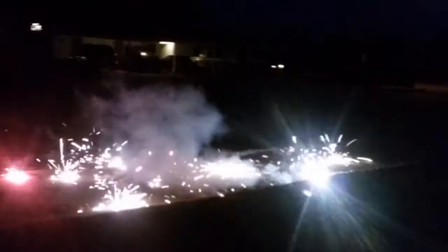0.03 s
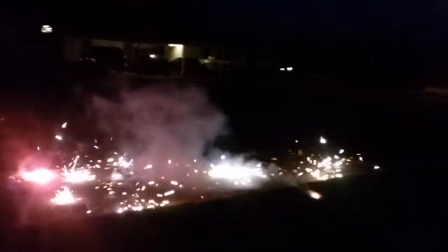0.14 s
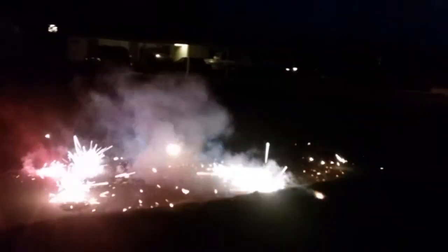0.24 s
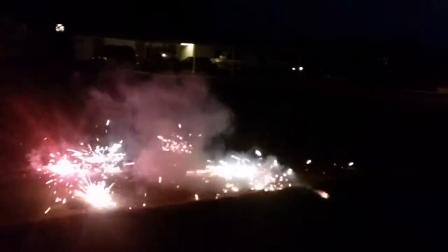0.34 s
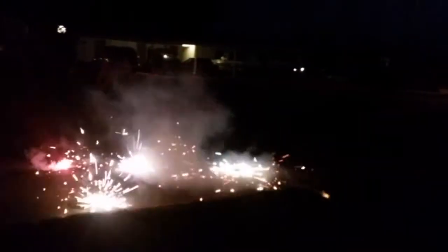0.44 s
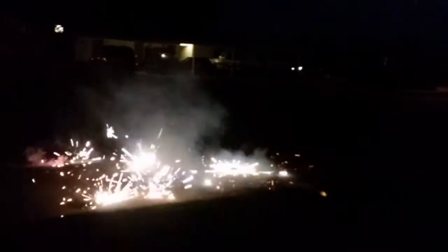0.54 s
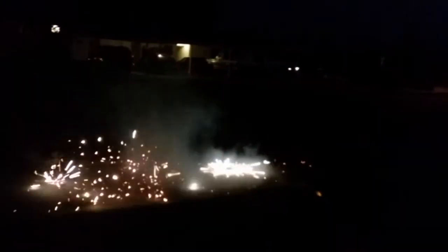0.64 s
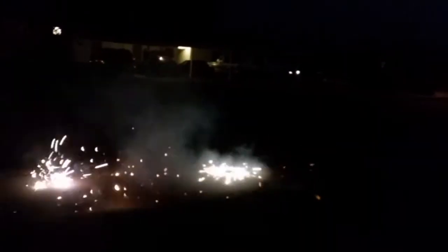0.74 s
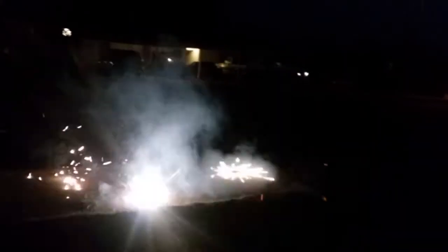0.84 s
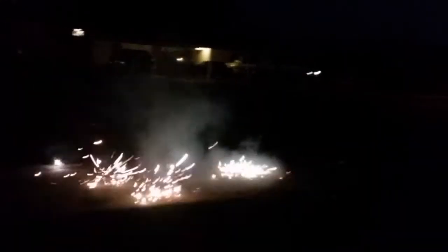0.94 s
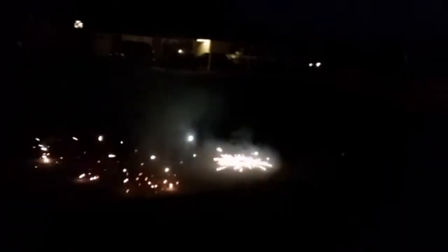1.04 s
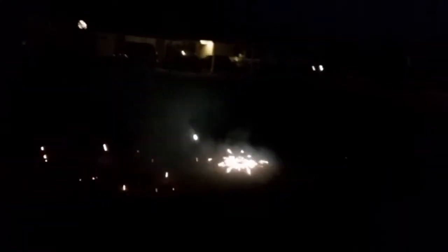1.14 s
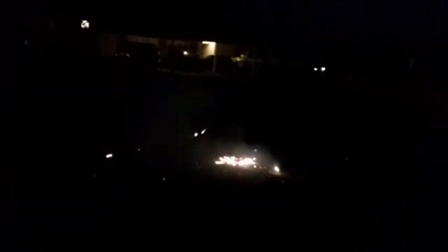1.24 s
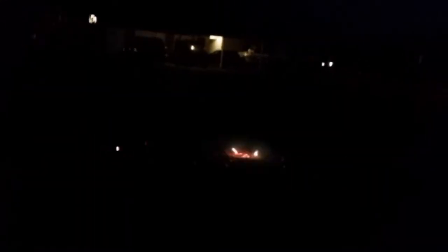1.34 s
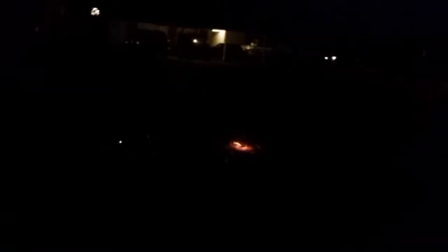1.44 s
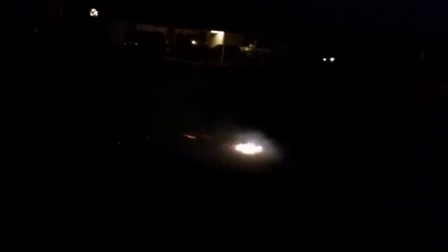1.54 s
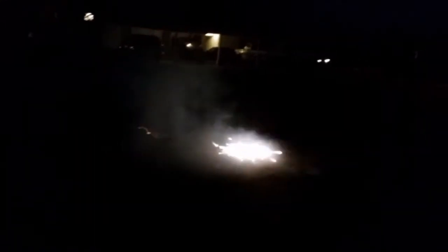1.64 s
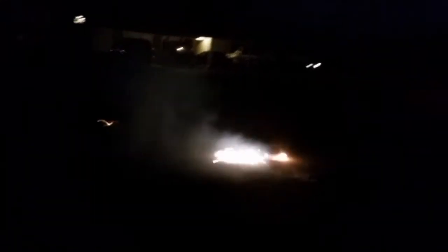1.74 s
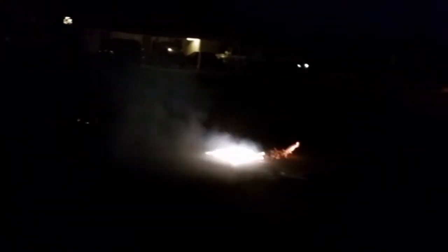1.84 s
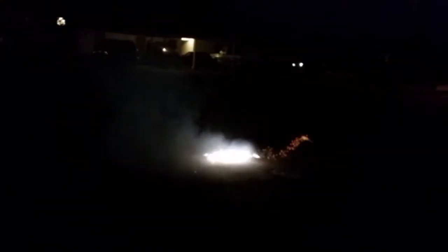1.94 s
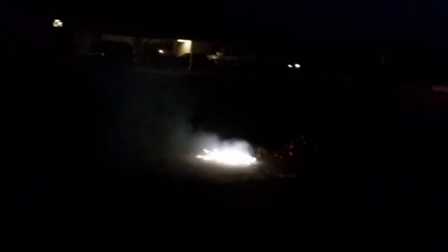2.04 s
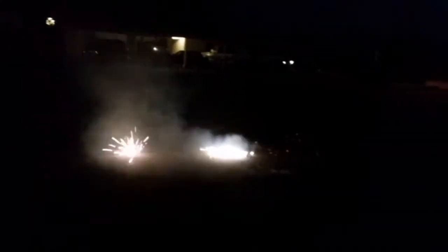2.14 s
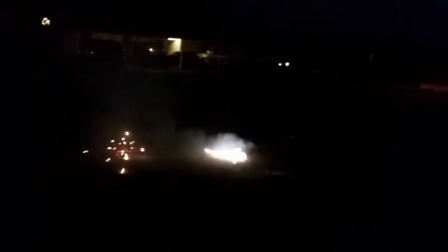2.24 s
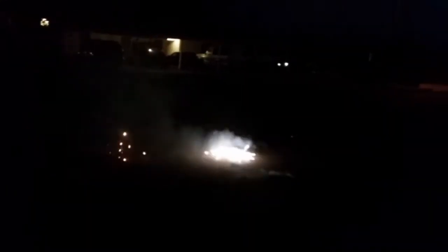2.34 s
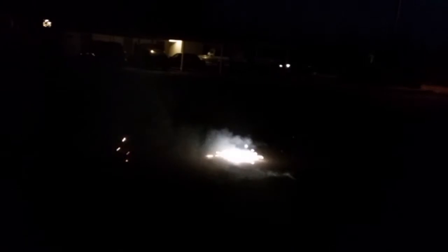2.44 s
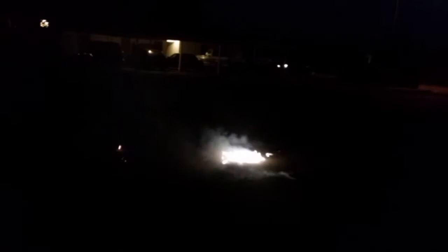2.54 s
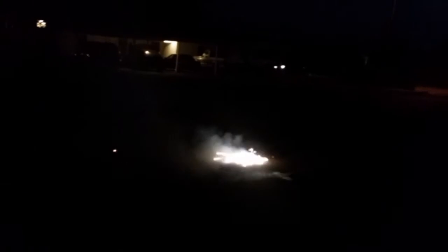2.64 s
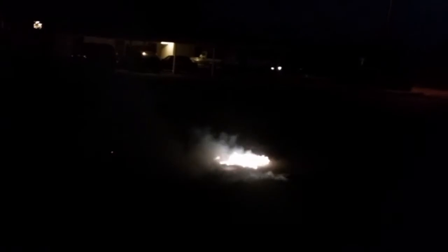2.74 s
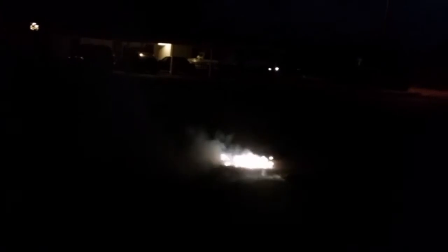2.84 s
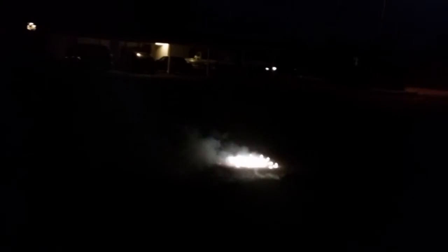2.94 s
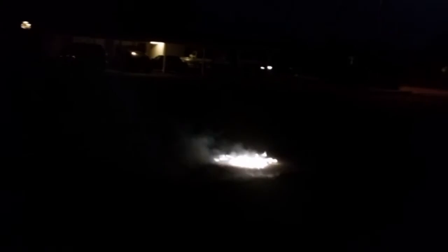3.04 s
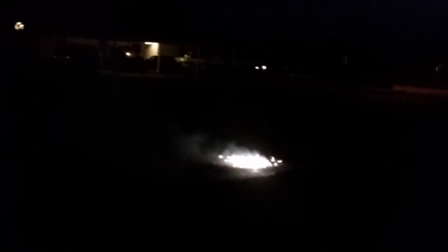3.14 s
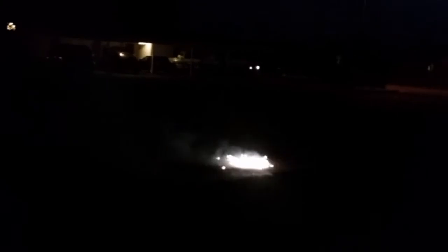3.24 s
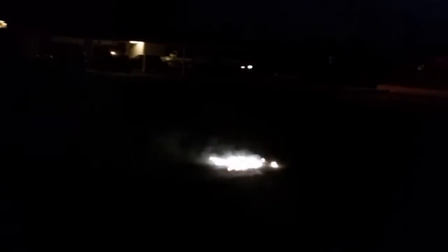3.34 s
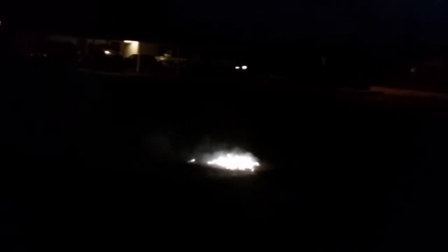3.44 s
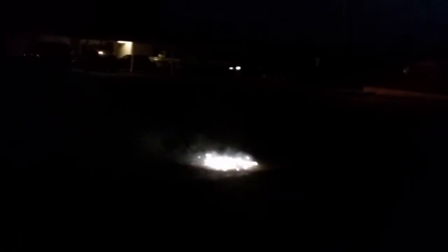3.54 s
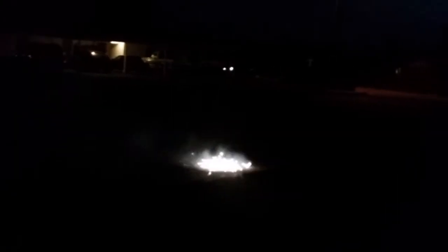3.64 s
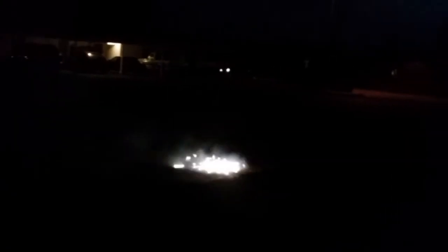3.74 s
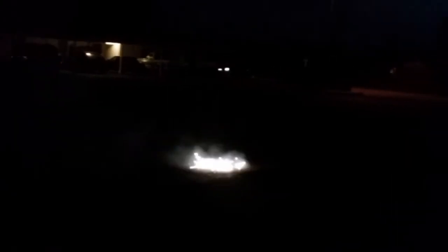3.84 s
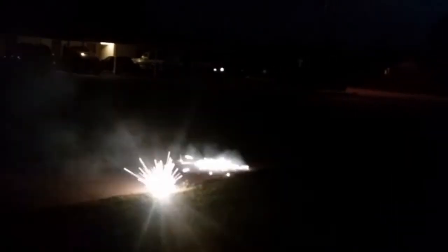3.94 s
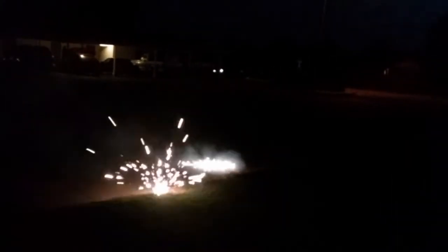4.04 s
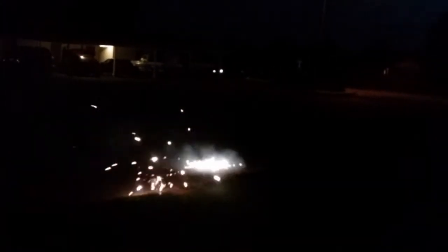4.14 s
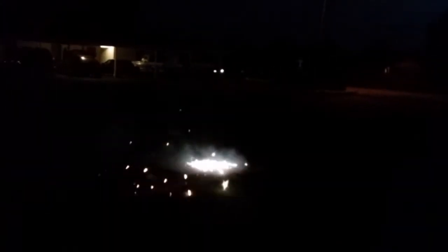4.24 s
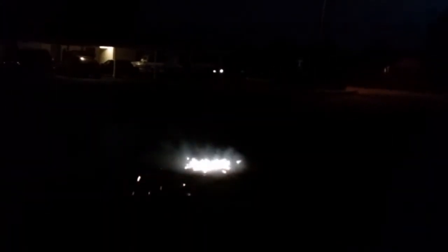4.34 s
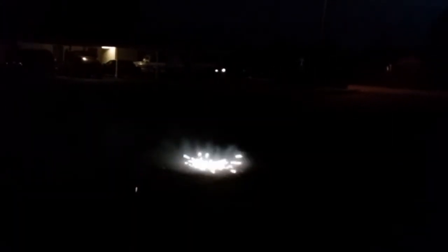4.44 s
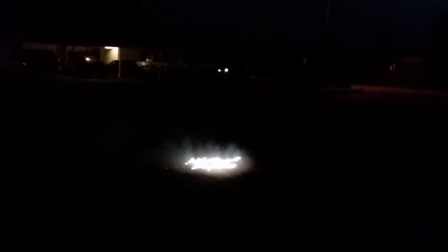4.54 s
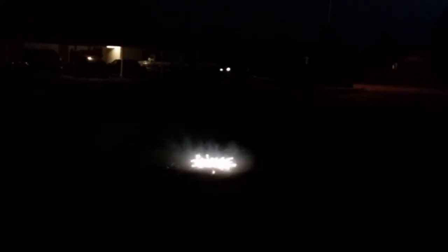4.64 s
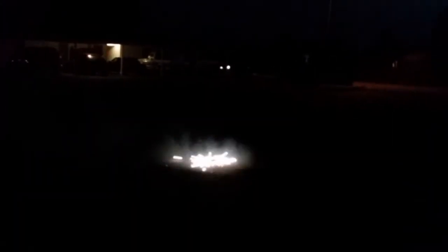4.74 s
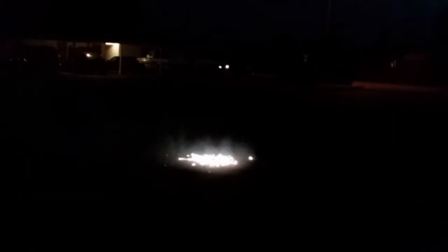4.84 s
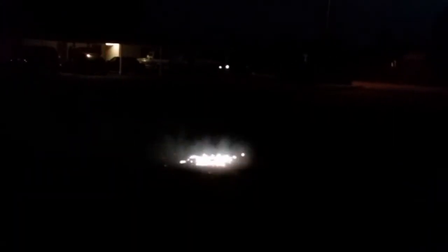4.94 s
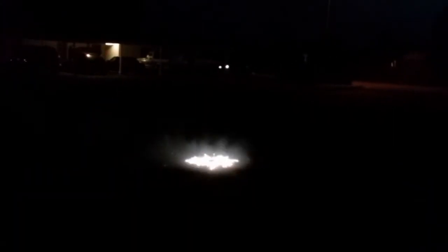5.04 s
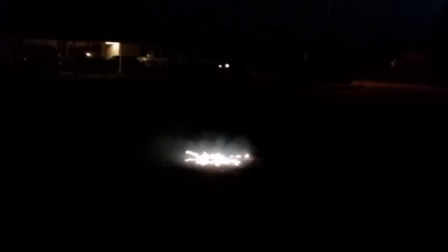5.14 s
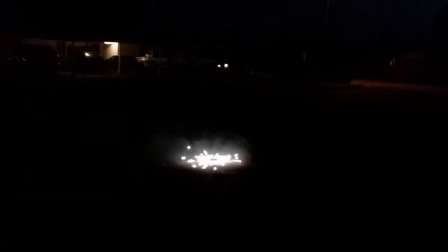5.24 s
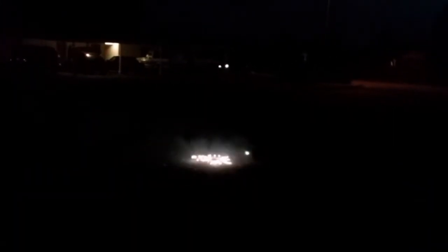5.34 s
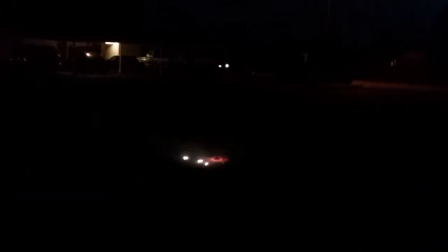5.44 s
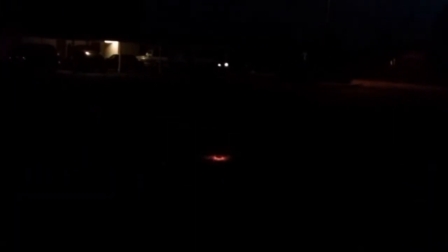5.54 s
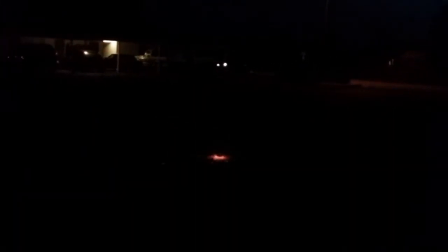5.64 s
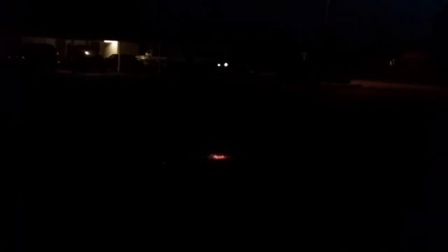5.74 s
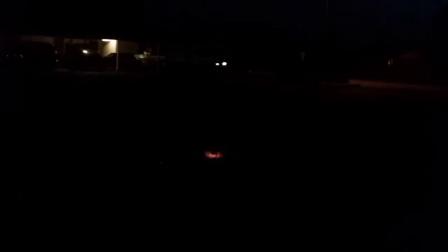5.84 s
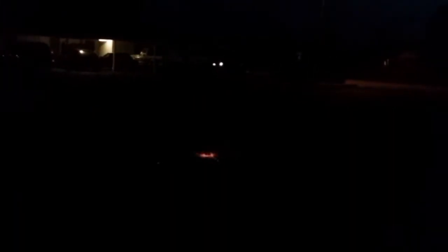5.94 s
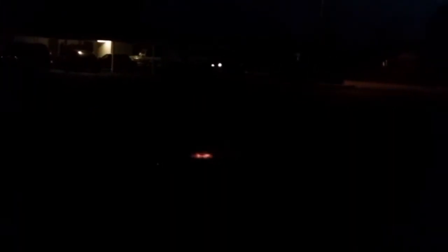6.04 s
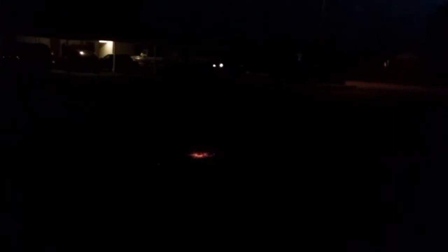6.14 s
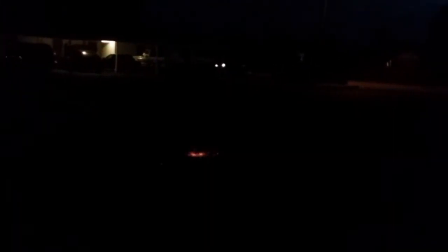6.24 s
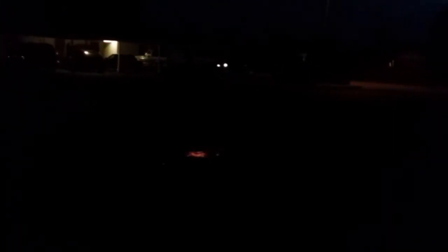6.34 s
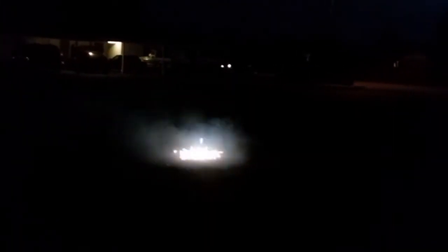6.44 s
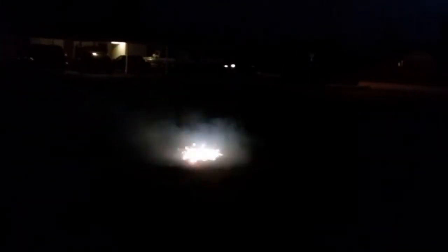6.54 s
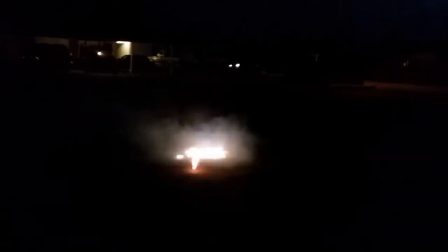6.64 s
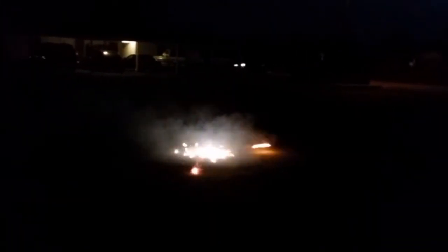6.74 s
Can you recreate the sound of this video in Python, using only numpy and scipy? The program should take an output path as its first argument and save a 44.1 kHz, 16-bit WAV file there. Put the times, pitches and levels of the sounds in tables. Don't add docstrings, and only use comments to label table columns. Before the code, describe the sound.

Outdoors on a lawn at night, a spinning firework is screaming from the start: a piercing, nearly pure whistle around 3 kHz, fluttering some 25 to 35 times a second, sliding down to about 2.4 kHz. Gas hiss and crackling stars accompany it, with sharper pops near 0.2, 0.7 and 1.2 s. At 1.5 s it dies with a tiny upward flick, leaving echo and small snaps. A short fizz leads to the second burn at 1.75 s, starting near 4.4 kHz, stumbling once, then falling steadily to 2.4 kHz by 5.6 s; its warble slows around 3 s, then races, with crackles around 4.5 s. Until 6.6 s only echoes, irregular faint pops and low distant town hum remain. A crack and fizz launch a third, rougher, hissier shriek near 4.4 kHz, cut off at the end. The phone microphone overloads harshly, the right side louder and brighter.

```python
import sys
import numpy as np
from scipy import signal
from scipy.fft import rfft, irfft, next_fast_len
from scipy.io import wavfile
from scipy.ndimage import uniform_filter1d

SR = 44100
rng = np.random.default_rng(int(sys.argv[2]) if len(sys.argv) > 2 else 0)


def put_to_file(sound):
    columns = np.atleast_2d(sound).T
    safe = np.clip(columns, -1, 1)
    whole_steps = np.round(safe * 32767)
    wavfile.write(sys.argv[1], SR, whole_steps.astype(np.int16))


def to_linear_factor(level_db):
    exponent = np.asarray(level_db, float) / 20
    return 10 ** exponent


N = 299880
TIME = np.arange(N) / SR

# (frequency [Hz], gain [dB])
CONVERTER_FILTER = [(1500, 0), (2500, 0), (3100, 0.5), (4300, -5), (6500, -5.5), (9500, -2.5), (13000, -1),
                    (15900, -6.5), (16300, -69)]


def reading(points, hz):
    f, db = np.transpose(points)
    return np.interp(np.log(np.maximum(hz, 1)), np.log(f), db)


def colour(x, points):
    size = next_fast_len(x.shape[-1] + 4096)
    gain = to_linear_factor(reading(points, np.fft.rfftfreq(size, 1 / SR)))
    return irfft(rfft(x, size) * gain, size)[..., :x.shape[-1]]


def unit(x):
    return x / np.sqrt(np.mean(x ** 2))


def walk(rate):
    hold = int(SR / rate)
    levels = np.repeat(rng.standard_normal(N // hold + 1), hold)
    levels = uniform_filter1d(uniform_filter1d(levels, hold), hold)
    return unit(levels[:N])


def spinner():
    # (pitch [Hz], level [dB])
    wall_level = [(2400, -33.5), (2900, -30.5), (3250, -23.5), (3550, -23.5), (3800, -24.5), (4200, -27.5),
                  (4340, -34), (4450, -32)]
    # (delay [ms], level [dB])
    reflections = [
        (9.9, -3.5),
        (27, -12),
        (46, -10.5),
    ]
    # (pitch [Hz], gain [dB])
    body_shade = [(2400, -3.5), (2600, -4.5), (2850, -1), (3100, 0), (3500, -1.5), (4100, 1.3), (4200, 8.5),
                  (4400, 7.5)]
    hz, turns, swing, lead, lawn_db, loud, thrown, blowing, shaky = burns()
    angle = 2 * np.pi * turns
    direct = uniform_filter1d(loud * to_linear_factor(lawn_db), size=200)
    echo = uniform_filter1d(thrown * to_linear_factor(reading(wall_level, hz)), size=200)
    clear_db, beam_per_loss = -13.5, 0.24
    beam_db = 1.15 + beam_per_loss * (clear_db - lawn_db)
    beam = to_linear_factor(1.25 * beam_db * np.sin(angle))
    tone = whistle(hz, angle, swing, shaky, loud)
    sound, sent = tone * direct * beam, tone * echo / beam
    for ms, db in reflections:
        lag = int(ms * SR / 1000)
        sound = sound + to_linear_factor(db) * np.concatenate([np.zeros(lag), sent[:-lag]])
    hiss = jet(hz, blowing) * beam * to_linear_factor(0.82 * walk(90))
    hiss = hiss * to_linear_factor(np.array([[-12.], [0.]]))
    right = sound * to_linear_factor(reading(body_shade, hz)) * np.exp(1j * lead)
    return np.array([sound.real, right.real]) + hiss, sent.real


def whistle(hz, angle, swing, shaky, loud):
    # (pitch [Hz], level [dB])
    octave_level = [(2420, -18), (2750, -22), (2880, -24), (3070, -34), (3400, -27), (4000, -36),
                    (4400, -24.5)]
    # (multiple of the pitch [-], level [dB])
    overtones = [
        (3, -39),
        (4, -59.5),
        (5, -67.5),
    ]
    wobble = shaky * (hz / 3000) ** 2 * (.0015 * walk(100) + .002 * walk(300))
    phase = 2 * np.pi * np.cumsum(hz * (1 + swing * np.cos(angle) + wobble)) / SR
    swell_db, peak_rad = 7, 2.35
    flare = to_linear_factor(2.5 * walk(80) + swell_db * np.cos(angle - peak_rad))
    tone = np.exp(1j * phase) + to_linear_factor(reading(octave_level, hz)) * flare * np.exp(2j * phase)
    for multiple, db in overtones:
        tone = tone + loud * to_linear_factor(db + 3 * walk(120)) * np.exp(1j * multiple * phase)
    return tone * np.sqrt(2) * to_linear_factor(0.72 * walk(200) - reading(CONVERTER_FILTER, hz))


def jet(hz, blowing):
    # (frequency [Hz], level [dB])
    jet_spectrum = [(200, -30), (500, -14), (1000, -3), (2000, 0), (4000, -6), (6000, -24), (12000, -44)]
    # (pitch [Hz], level [dB])
    jet_level = [(2400, -41.5), (2750, -37.5), (2950, -36), (3250, -29.5), (3700, -35), (4050, -47.5),
                 (4400, -44.5)]
    # (start [s], end [s], final level [dB])
    fizzes = [
        (1.715, 1.801, -52),
        (6.611, 6.653, -36),
    ]
    gain = uniform_filter1d(blowing * to_linear_factor(reading(jet_level, hz)), size=200)
    for start, end, db in fizzes:
        rise_db = np.interp(TIME, [start, end, end + .01], [db - 12, db, -120], left=-120)
        gain = gain + to_linear_factor(rise_db)
    return unit(colour(rng.standard_normal((2, N)), jet_spectrum)) * gain


def burns():
    # (time [s], pitch [Hz])
    pitches = [
        [(-.1, 3029), (.06, 3040), (.125, 2865), (.375, 2692), (.625, 2626), (1., 2485), (1.375, 2385),
         (1.529, 2360)],
        [(1.75, 4370), (1.92, 4450), (2., 4335), (2.33, 4175), (2.7, 3765), (2.95, 3672), (3.375, 3250),
         (4.625, 2618), (5.634, 2385)],
        [(6.631, 4415), (7.2, 4290)],
    ]
    # (time [s], rate [turns/s])
    spins = [
        [(0, 24.75), (.25, 28.84), (.875, 32.91), (1.375, 34.85), (1.5, 31.83)],
        [(1.875, 26.5), (2.25, 24.85), (2.78, 23.), (2.95, 20.5), (3.25, 20.42), (3.75, 22.12), (4.5, 31.02),
         (5.6, 41.18)],
        [(6.66, 26), (6.8, 26)],
    ]
    first_turns = [.34, 4.75, .93]
    # (pitch [Hz], level [dB])
    lawn_bounces = [
        [(2400, -14), (2640, -12.5), (2850, -18), (3040, -16)],
        [(2400, -15.5), (2680, -15), (2850, -17), (3050, -13), (3200, -11.5), (3600, -10), (3850, -16.5),
         (4350, -27.5)],
        [(4300, -18), (4420, -23)],
    ]
    # (jet [dB], echo [dB], extra right lead [rad], burn-out [s], pitch unsteadiness [dB])
    burn_settings = [
        (2, 1.1, 0.16, 0.14, -0.02),
        (-0.17, -0.3, -0.0078, 0.094, -2),
        (5.5, 11, -1.6, .1, 5.5),
    ]
    # (pitch [Hz], lead [rad])
    port_lead = [(2400, .55), (2600, 0.56), (2780, 1.11), (3020, .35), (3300, 1.3), (3700, 2.4),
                 (3970, 1.69), (4350, 2.24)]
    # (time [s], radius [m])
    circle = [(.07, 0.095), (.16, 0.057), (1.5, 0.051), (1.92, 0.055), (2.4, .044), (2.8, 0.069),
              (3.1, .05), (4.6, .06), (6.7, 0.037)]
    attack_s, dying_db, dying_power, jet_dying_db = 0.0081, -13, 1.88, -19.5
    flick_share, flick_done = .075, .65
    stumble_s, stumble_width_s, stumble_share = 1.817, .026, .115
    radius = np.interp(TIME, *np.transpose(circle))
    out = np.zeros((9, N))
    for pitch, spin, first_turn, lawn, settings in zip(
            pitches, spins, first_turns, lawn_bounces, burn_settings):
        jet_db, echo_db, extra_lead, fade_s, shaky_db = settings
        s, tube_hz = np.transpose(pitch)
        dying = np.clip(1 - (s[-1] - TIME) / fade_s, 0, 1)
        choke = stumble_share * np.exp(-((TIME - stumble_s) / stumble_width_s) ** 2)
        flick = flick_share * np.minimum(dying / flick_done, 1)
        hz = (1 + flick - choke) / np.interp(TIME, s, 1 / tube_hz)
        rate = np.interp(TIME, *np.transpose(spin))
        turns = np.cumsum(rate) / SR
        turns = turns - turns[int(spin[0][0] * SR)] + first_turn
        swing = 2 * np.pi * radius * rate / 343 * (1 - choke / stumble_share)
        lit = (1 - np.exp(-np.maximum(TIME - s[0], 0) / attack_s)) * (TIME < s[-1])
        loud = lit * to_linear_factor(dying_db * dying ** dying_power)
        blowing = lit ** 2 * to_linear_factor(jet_db + jet_dying_db * dying)
        lead = extra_lead + reading(port_lead, hz)
        shaky = to_linear_factor(shaky_db + 0 * TIME)
        rows = [hz, turns, swing, lead, reading(lawn, hz), loud, loud * to_linear_factor(echo_db), blowing, shaky]
        out = np.where(TIME >= s[0], rows, out)
    return out


def stars():
    # (time [s], peak level [dB])
    bursts = [(0.0, -23), (0.171, -31), (0.226, -30), (0.695, -28.5), (1.165, -31), (1.595, -44),
              (1.617, -50), (1.633, -42), (1.689, -38.5), (5.69, -53), (5.734, -40), (5.766, -47),
              (5.785, -42), (5.848, -35.5), (5.936, -43), (5.999, -46.5), (6.044, -43), (6.107, -42.5),
              (6.194, -46.5), (6.275, -53), (6.337, -47), (6.394, -76.5), (6.42, -51), (6.464, -61),
              (6.492, -45), (6.554, -46), (6.591, -63), (6.62, -29)]
    # (frequency [Hz], level [dB])
    crack_spectrum = [(500, -30), (900, -7), (1400, -2), (2100, 0), (2600, -12), (4000, -20), (6000, -45)]
    # (middle [s], reach [s], level [dB])
    swarms = [
        (0.799, 0.77, -46),
        (4.5, 0.89, -42),
    ]
    stragglers_db = -89.5
    age = np.arange(400) / SR
    kicks = np.zeros(N)
    cracks = rng.standard_normal((len(bursts), 400)) * np.exp(-age / 0.0017)
    for (s, db), crack in zip(bursts, cracks):
        start = int((s + 0.00047) * SR)
        kicks[start:start + 400] += to_linear_factor(db + 14.5) * crack
    small = (rng.random(N) < 70 / SR) * to_linear_factor(2.3 * rng.exponential(size=N))
    small = signal.fftconvolve(small, np.exp(-age / 0.0016))[:N] * rng.standard_normal(N)
    busy = to_linear_factor(stragglers_db)
    for middle, reach, db in swarms:
        busy = busy + to_linear_factor(db - 10 * np.abs((TIME - middle) / reach) ** 3)
    return colour(kicks + unit(small) * busy, crack_spectrum)


def walls(x):
    level_db, t60_s, far_db, far_t60_s = -6, 0.78, -15.5, 2.1
    t = np.arange(2 * SR) / SR
    decay = to_linear_factor(-60 * t / t60_s) + to_linear_factor(far_db - 60 * t / far_t60_s)
    tail = rng.standard_normal((2, 2 * SR)) * decay
    tail = tail * to_linear_factor(2 * walk(23.1)[:2 * SR]) * (t > .05)
    tail = tail / np.sqrt(np.sum(tail[0] ** 2))
    return signal.fftconvolve(x[None], tail, axes=1)[:, :N] * to_linear_factor(level_db)


def night():
    # (frequency [Hz], level per Hz [dB])
    town_spectrum = [(35, 10), (62, 18), (110, 21), (200, 8), (400, 0), (630, -6), (1000, 5), (1600, 0),
                     (2100, 2), (3200, 1), (4200, 3), (5300, 0), (6300, -9), (12000, -28)]
    mid, side = colour(rng.standard_normal((2, N)), town_spectrum)
    side = colour(side, [(250, 4.5), (1000, 2.5)])
    return unit(np.array([mid + side, mid - side])) * to_linear_factor(-57 + 0.59 * walk(0.33))


def overload(x):
    ceiling = np.where(x > 0, 0.42, 0.37)
    knee = 43
    return x / (1 + (np.abs(x) / ceiling) ** knee) ** (1 / knee)


def scene():
    direct, sent = spinner()
    pops = stars()
    returns = colour(walls(sent + 0.32 * pops), [(3500, 2.0), (5000, 0.5), (7000, -14.0)])
    return direct + pops + returns + night()


def roll_off(x):
    return signal.sosfilt(signal.butter(12, 16990, fs=SR, output="sos"), x)


def record(dry):
    # (frequency [Hz], gain [dB])
    right_gain = [(700, 0), (1300, 4.5), (2400, 11), (3200, 12), (4400, 14.5), (8000, 12.5), (15000, 4)]
    # (frequency [Hz], gain [dB])
    bass_rolloff = [(25, -38.5), (60, -15), (150, -9.5), (400, -4.5), (700, -1)]
    ports = np.array([dry[0], colour(dry[1], right_gain)])
    fast = overload(signal.resample_poly(ports, 160, 147, axis=1))
    back = signal.resample_poly(fast, 147, 160, axis=1)[:, :N]
    mix = colour(colour(back, bass_rolloff), CONVERTER_FILTER)
    return roll_off(mix)


dry = scene()
out = record(dry)
put_to_file(out)
```